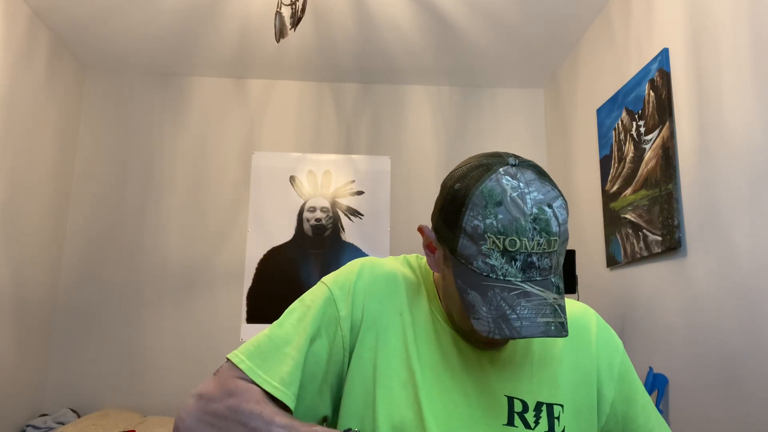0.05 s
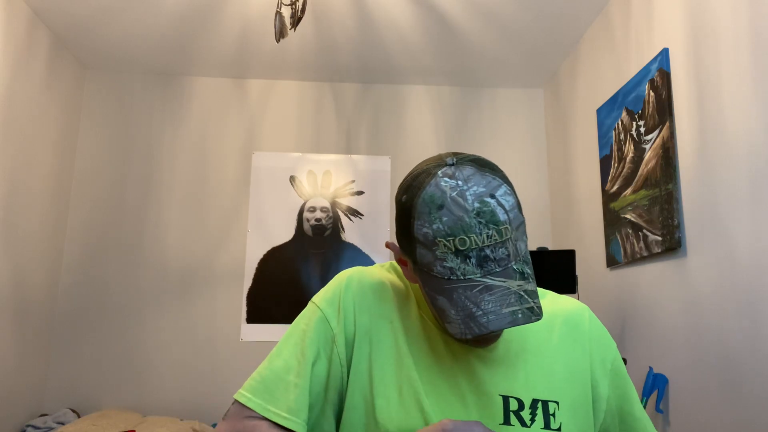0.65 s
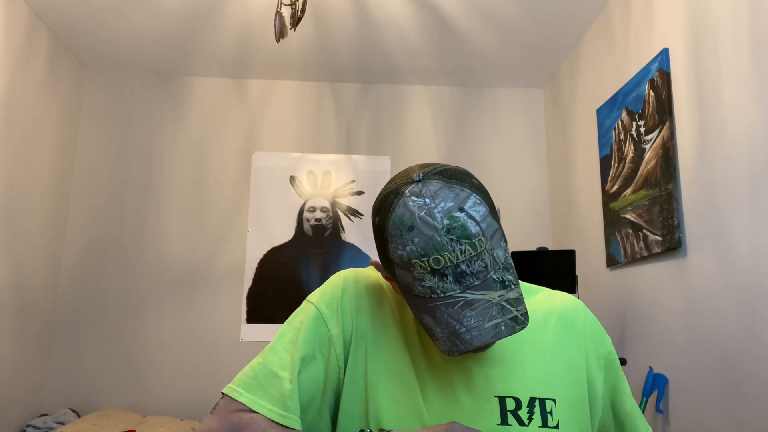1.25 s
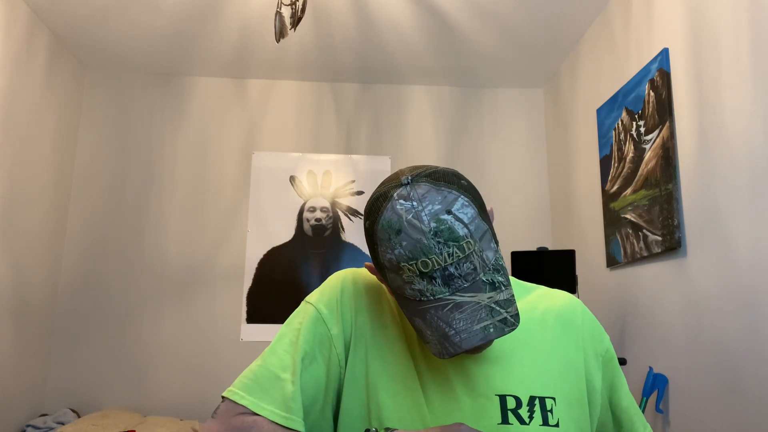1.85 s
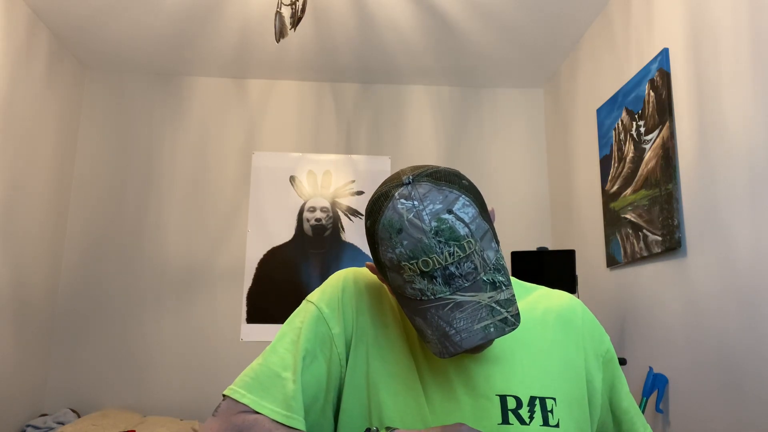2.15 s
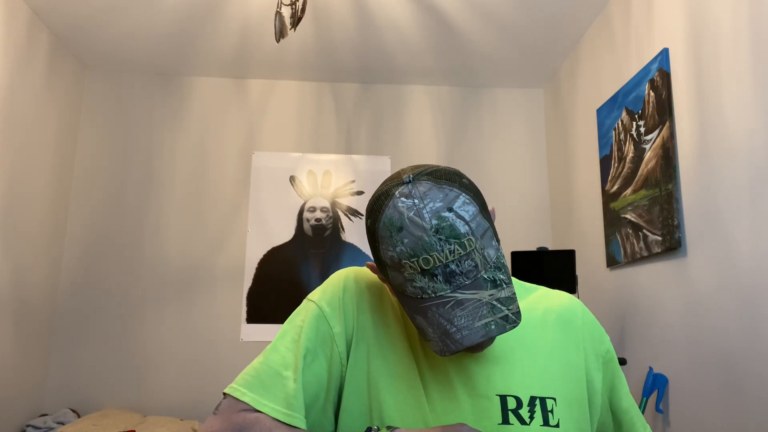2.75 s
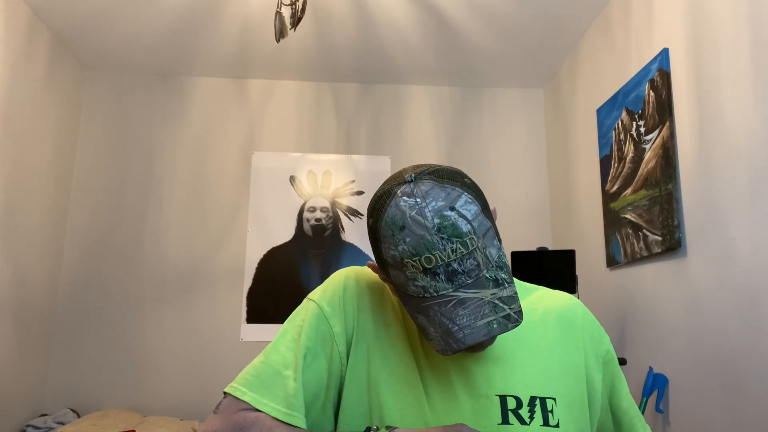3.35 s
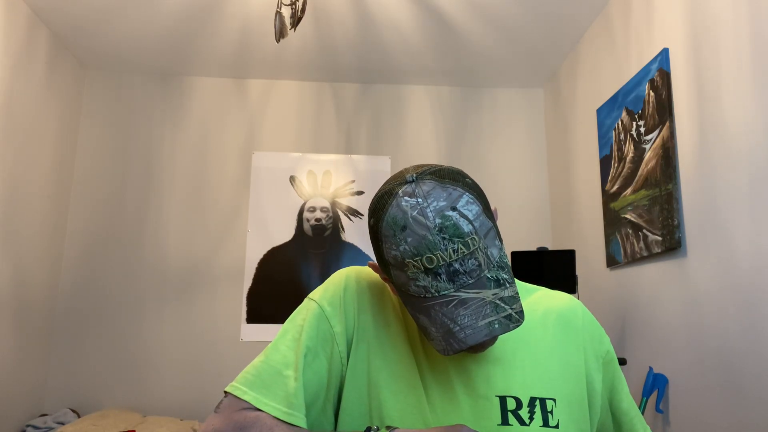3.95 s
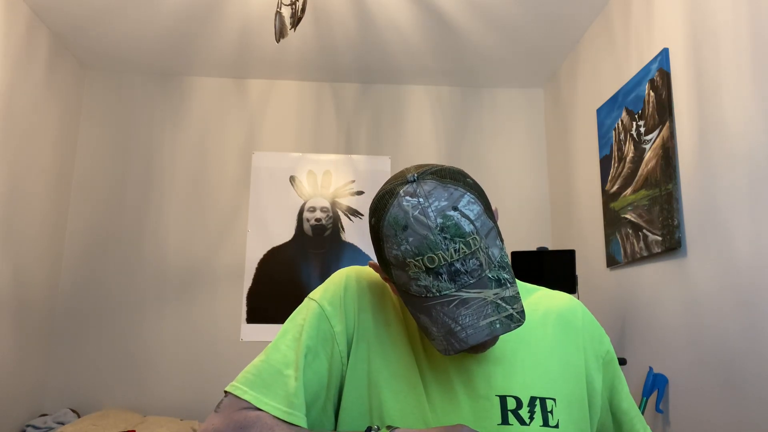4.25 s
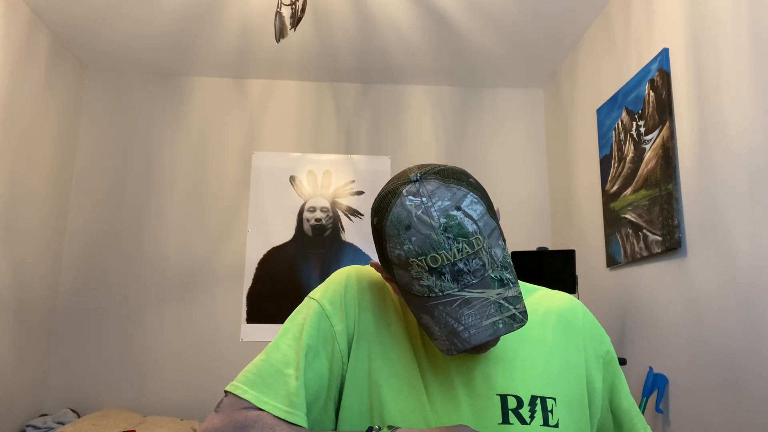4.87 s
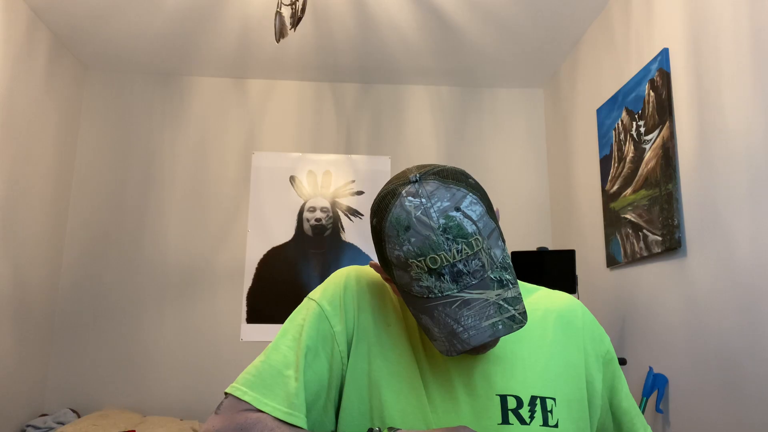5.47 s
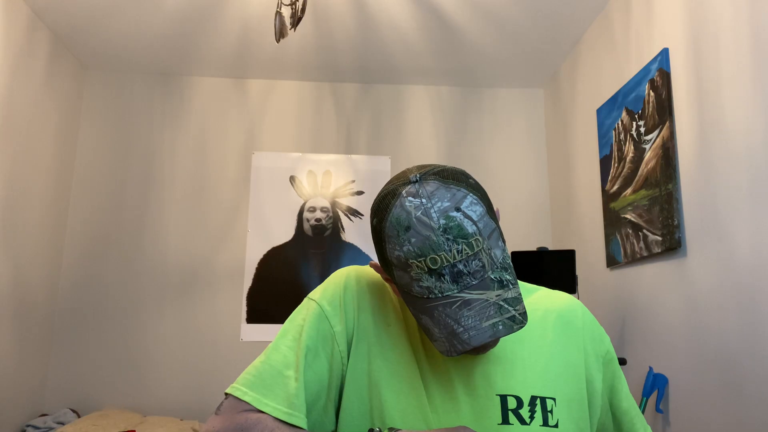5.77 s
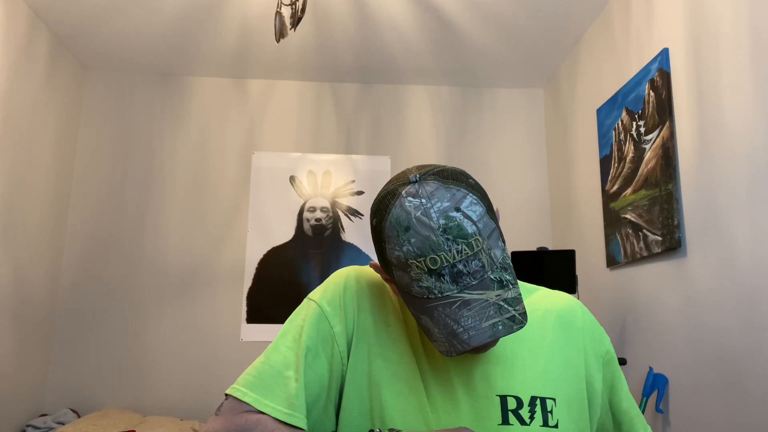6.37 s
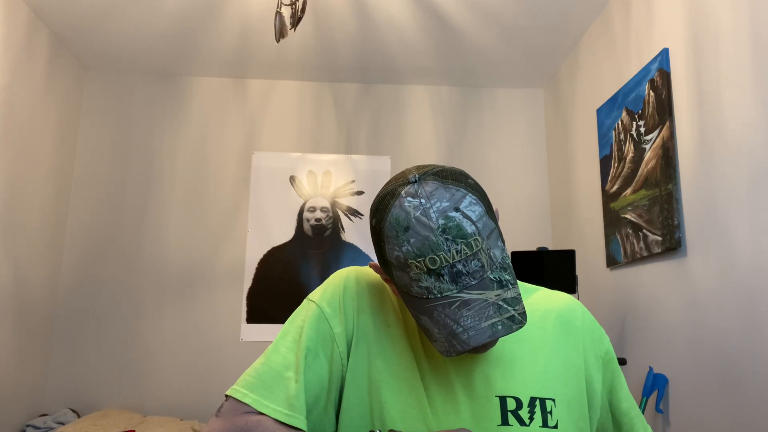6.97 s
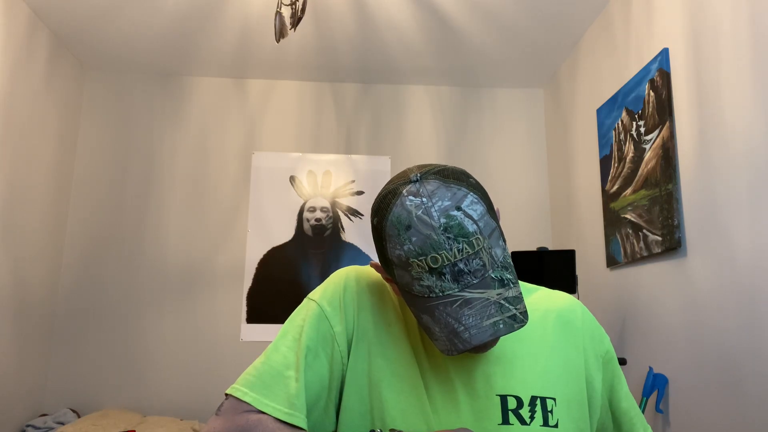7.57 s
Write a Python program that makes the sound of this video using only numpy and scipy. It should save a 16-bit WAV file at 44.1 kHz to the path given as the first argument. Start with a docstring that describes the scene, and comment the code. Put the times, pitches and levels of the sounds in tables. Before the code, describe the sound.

A small electric rotary tool hums and whines continuously, its wheel biting into plastic with scrapes, a brief screech and later grinding.

```python
"""A small room, a stereo microphone near a handheld rotary tool that cuts a slot in a plastic door.
From the start the motor sings a stack of shaft orders over its fan's rush and a mains buzz. Its speed
beats against the mains and slowly sags, so the orders slide through resonances of door and room,
swelling and shifting between left and right. From 1.9 to 4.2 s the wheel bites, rings and chatters.
Around 7 s it grinds deep in the slot and drags the motor down."""
import sys
import numpy as np
from scipy import signal
from scipy.fft import rfft, irfft
from scipy.io import wavfile
from scipy.ndimage import uniform_filter1d

SR = 44100
rng = np.random.default_rng(int(sys.argv[2]) if len(sys.argv) > 2 else 0)


def generate_wav(sig):
    """Save sig (samples, or channels by samples) to the path in sys.argv[1] as 16-bit PCM at SR."""
    pcm = np.round(np.clip(np.atleast_2d(sig).T, -1, 1) * 32767).astype(np.int16)
    wavfile.write(sys.argv[1], SR, pcm)


N = 336042
TIME, BINS = np.arange(N) / SR, np.fft.rfftfreq(N, 1 / SR)
MAINS_PULSE_HZ = 120

# shaft turns a second under the load of the cut: t/s, f/Hz
SHAFT_SPEED = [(0.0, 237.41), (0.18, 236.14), (0.33, 238.03), (0.47, 235.33), (2.3, 236.1), (2.6, 232.95),
               (3.35, 236.19), (3.6, 236.13), (3.75, 234.58), (4.4, 233.16), (5.05, 232.19), (5.4, 232.63),
               (5.9, 231.7), (6.65, 229.65), (6.8, 227.93), (7.2, 225.39), (7.45, 226.75), (7.62, 225.8)]
# multiples of the shaft speed that carry the hum
HUM_ORDERS = [1, 2, 3, 4, 5, 6, 7, 8, 10, 13, 14, 15]
# rings of the wheel and its shank: f/Hz, width/Hz, relative level/dB
WHEEL_MODES = [(3386, 125, 13), (5530, 170, 8), (8570, 240, 5.5), (9110, 85, 11.5), (9500, 3200, -10),
               (10740, 55, 9.5), (12400, 74, 6.5), (14200, 100, 5)]
# the microphone's two ports: f/Hz, likeness/0-1, left lead/rad
MIC_PORTS = [(200, .85, 0), (650, .4, .3), (1400, .3, -1), (2900, .45, 0), (4200, .3, -1.4), (6500, .2, 0),
             (7400, .85, 0), (8700, .75, -1.7), (9600, .995, -3.05), (10800, .995, -3.2),
             (11900, .55, -5.8), (13800, .9, -6.4), (14800, .95, -9.2)]


def gain_of(db):
    """Decibels to amplitude."""
    return 10 ** (np.asarray(db) / 20)


def unit_rms(x):
    """Scales to rms 1."""
    return x / np.sqrt(np.mean(abs(x) ** 2) + 1e-20)


def over_time(rows):
    """A table of times and values, at each sample."""
    return np.interp(TIME, *np.transpose(rows))


def over_freq(rows, hz):
    """Every column of a table of frequencies, interpolated on a log axis."""
    f, *columns = np.transpose(rows)
    return [np.interp(np.log(hz + 1), np.log(f + 1), c) for c in columns]


def drift(rate_hz):
    """Slow random wander of rms 1."""
    coarse = TIME[::128]
    f = np.fft.rfftfreq(len(coarse), 128 / SR)
    slow = irfft(rfft(rng.standard_normal(len(coarse))) / (1 + (f / rate_hz) ** 2), len(coarse))
    return np.interp(TIME, coarse, unit_rms(slow))


def rings(modes):
    """Frequency response of a set of resonances, alternating in sign."""
    return sum(gain_of(db) / (1 + 2j * (BINS - hz) / width) * (-1) ** k
               for k, (hz, width, db) in enumerate(modes))


def at_mic(pair, colour):
    """Colours two unrelated signals and makes them as alike as the two ports hear them, at rms 1."""
    likeness, lead = over_freq(MIC_PORTS, BINS)
    left, other = rfft(pair) * colour
    right = (likeness * left + np.sqrt(1 - likeness ** 2) * other) * np.exp(-1j * lead)
    return unit_rms(irfft([left, right], N))


def room(x, t60=0.015, wet_db=-8, echoes_per_s=2000):
    """Bare walls add a short tail of sparse reflections."""
    t = TIME[:SR // 2]
    arrivals = rng.random((2, len(t))) < echoes_per_s / SR
    taps = rng.standard_normal((2, len(t))) * arrivals * gain_of(-60 * t / t60)
    taps /= np.linalg.norm(taps, axis=1, keepdims=True)
    return x + gain_of(wet_db) * signal.fftconvolve(x, taps, axes=1)[:, :N]


def standing_waves(hz):
    """How strongly, and in what phase, a tone reaches the left and the right port."""
    # resonances of door and room: f/Hz, width/Hz, level/dB, left minus right/dB, left lead/rad
    resonances = [(232.76, 7.7, -43.5, 4, .5), (456.4, 7.5, -30.5, 1.5, 2.17), (465.1, 14, -35.5, 2.5, 0.5),
                  (690.6, 20, -32.5, 0.5, 3.5), (707, 5.8, -36.5, 0.5, -2), (710.6, 14.5, -32, -10, 0.61),
                  (906, 10.4, -26.5, 4, 0.5), (920.8, 12.1, -25, -2.5, 0.02), (933, 4.7, -36.5, -13, -1.34),
                  (944.8, 5.7, -39, -8, 0.9), (1127.3, 50, -36.5, -6.5, 1), (1159.2, 12.4, -33, 2.5, -0.7),
                  (1195.8, 11, -28, -4, 1.5), (1359, 13, -36.5, 0, 1.8), (1384, 27, -34, 0.5, -1.5),
                  (1572, 32, -31.5, -4, -0.5), (1633.4, 30, -41, -1, -1.1), (1810, 18, -33, 1, 4),
                  (1837.7, 37, -34.5, -4, 0), (1881, 5.3, -38, -6, 1.5), (2278.5, 42, -34.5, -3, 0),
                  (2365, 43, -39.5, -1.5, -0.54), (2966, 94, -38, 1, 0.8), (3073, 23.5, -37, -6.5, -1),
                  (3231, 61, -37.5, -3.5, 0.4), (3497, 350, -39, 0, 1)]
    left, right = 0, 0
    for centre_hz, width_hz, db, pan_db, lead in resonances:
        peak = gain_of(db) / (1 + (2 * (hz - centre_hz) / width_hz) ** 2)
        left += peak * gain_of(pan_db / 2)
        right += peak * gain_of(-pan_db / 2) * np.exp(-1j * lead)
    return left, right


def flare_db(order, width_s=0.085):
    """An order flares or drops out briefly as the tool passes a standing wave."""
    # swells and dips: t/s, order, level/dB
    flares = [(0.1, 20, 11), (0.1, 21, 10), (0.33, 15, 7), (4.26, 14, 7), (4.58, 14, -10), (4.62, 15, -11),
              (4.82, 7, 7), (7.04, 14, 9)]
    return sum(db * np.exp(-((TIME - s) / width_s) ** 2) for s, k, db in flares if round(k) == order)


def hunting(surge_hz2=2.325):
    """Speed swing in Hz as the shaft slips against twice the pulse rate: more slip, faster and smaller."""
    slip_hz = np.maximum(2 * MAINS_PULSE_HZ - over_time(SHAFT_SPEED), 1)
    return surge_hz2 / slip_hz * np.cos(2 * np.pi * np.cumsum(slip_hz) / SR)


def shaft_angle(play_rad=0.023):
    """The shaft turns at its hunting speed, with a little play in the bearings."""
    return 2 * np.pi * np.cumsum(over_time(SHAFT_SPEED) + hunting()) / SR + play_rad * drift(25)


def buzz(waver=0.98):
    """The chopped mains current shakes the motor's field."""
    # outline of the buzz lines before they waver: f/Hz, level/dB
    outline = [(120, -74.5), (600, -59), (840, -50), (1320, -54), (2040, -51), (2520, -59)]
    out = np.zeros((2, N))
    for hz in MAINS_PULSE_HZ * np.arange(1, 31):
        level = np.sqrt(2) * gain_of(over_freq(outline, hz)[0]) * (1 + waver * drift(9.4))
        out += level * np.cos(2 * np.pi * (hz * TIME + rng.random() + rng.random((2, 1)) / 2))
    return out


def fan(angle, grip, throb=0.15, ripple=0.11, flutter_db=0.7):
    """Air puffs from the vents each turn; in the second grip they face the microphone and hiss more."""
    # loudness of the rush: t/s, level/dB
    loudness = [(0, -31.5), (.55, -34.5), (1.8, -32.5), (2.6, -28.5), (4.3, -32), (6.6, -31)]
    # its colour with the vents on axis: f/Hz, relative level/dB
    on_axis = [(50, -16), (150, -20.5), (380, -10), (840, 4), (1600, 0), (3300, 0), (4640, -1.5),
               (8100, -1.5), (10400, -6.5), (13900, -8)]
    # the part of that colour owed to facing the microphone: f/Hz, level/dB
    facing = [(3300, -1), (8100, 5), (13900, 2.5)]
    puffs = 1 + throb * (np.cos(angle) + np.cos(2 * angle))
    mains_ripple = 1 + ripple * np.cos(2 * np.pi * MAINS_PULSE_HZ * TIME)
    air = rng.standard_normal((2, N)) * puffs * mains_ripple
    colour_db, facing_db = over_freq(on_axis, BINS)[0], over_freq(facing, BINS)[0]
    away, toward = at_mic(air, gain_of(colour_db - facing_db)), at_mic(air, gain_of(colour_db))
    return (away + (toward - away) * grip) * gain_of(over_time(loudness) + flutter_db * drift(37))


def whine(angle, grip, level_db=-31.5, sway_db=3.2, beat=0.25, shake_rad=0.7, wander_rad=0.3):
    """Brushes and bearings tick once a turn; mains pulses shake them, adding lines between the orders."""
    # outline of the ticking: order, relative level/dB in the first grip and in the second
    outline = [(9, -2.5, 6), (11.8, 1, 1.5), (16.2, 1, 2.5), (18.1, -2, 2.5), (20.7, -3.5, 0),
               (23.2, -1, -7), (26.5, 0, -0.5), (37.8, -3.5, -2.5), (42, -34, -39)]
    out, mains = np.zeros((2, N)), 2 * np.pi * MAINS_PULSE_HZ * TIME
    for order in sorted(set(range(1, 47)) - set(HUM_ORDERS)):
        first_db, second_db = over_freq(outline, order)
        pulse = np.cos(mains + 2 * np.pi * rng.random())
        db = first_db + (second_db - first_db) * grip + sway_db * drift(8) + flare_db(order)
        level = gain_of(db) * (1 + beat * (2 * pulse ** 2 - 1))
        shaken = order * angle + shake_rad * (1 - 0.6 * grip) * pulse
        for port in out:
            port += level * np.cos(shaken + 2 * np.pi * rng.random() + wander_rad * drift(4))
    out = room(out, t60=0.25, wet_db=-5)
    out /= np.sqrt(uniform_filter1d((out ** 2).mean(0), SR // 2))  # holds the overall level steady
    return at_mic(out, 1) * gain_of(level_db)


def hum(angle, lift_db=0.7, sway_db=0.5, sway_rad=0.18, sway_hz=6, scatter_rad=0.34, sluggish=4.3):
    """Imbalance and fan blades give the loud orders; each swells as it meets a resonance."""
    # rise and fall as the hand moves the tool, by order: t/s, level/dB
    hand_moves = {1: [(3.45, 0), (3.7, 3.5), (5.5, -2.5)], 2: [(6.77, 1), (6.83, -12), (7.02, 0),
                  (7.08, -12), (7.28, 4.5), (7.4, -11)], 3: [(0, -5.5), (.2, 2), (.55, -14.5), (1.1, 1),
                  (5.4, 0), (5.8, -12.5), (6.2, 4), (6.9, 11), (7.2, 0)], 4: [(3.6, -1), (3.75, -9),
                  (4.4, -16), (4.8, 0.5), (7.12, -2), (7.19, -9), (7.28, -7)], 6: [(2.8, 3), (4.4, 0)],
                  13: [(.3, -12), (.6, 2.5), (2.1, 5), (3.5, 6), (4.8, -8), (6, 5), (7.2, 3)]}
    out, grid_hz = np.zeros((2, N)), BINS[BINS < SR / 10]
    mean_hz, hunting_hz = over_time(SHAFT_SPEED), hunting()
    responses = standing_waves(grid_hz)
    for order in HUM_ORDERS:
        reach = np.sqrt(order)  # the hand's sway moves the short waves most
        moved_db = over_time(hand_moves.get(order, [(0, 0)]))
        db = lift_db + sway_db * reach * drift(sway_hz) + moved_db + flare_db(order)
        phase = order * (angle + scatter_rad * rng.standard_normal())  # only low orders line up
        tone = -np.exp(1j * phase) * gain_of(db)
        # low resonances build up slowly; high ones surge with the hunting
        felt_hz = order * (mean_hz + hunting_hz * order / (order + sluggish))
        for port, response in zip(out, responses):
            sway = np.exp(1j * sway_rad * reach * drift(sway_hz))
            port += np.sqrt(2) * (tone * sway * np.interp(felt_hz, grid_hz, response)).real
    return out


def pressing(attack_s=0.036, release_db_per_s=116):
    """Strength of rasp, chatter and screech: each press into the plastic rises, holds and lets go."""
    # presses of the wheel: t/s, hold/s, level/dB of rasp, of chatter and of screech
    presses = [(1.9, 1, -33, -70, -63), (2.916, 0.037, -29, -34, -65), (3.1, .36, -44, -50, -68),
               (3.546, 0.068, -27, -37, -25), (3.663, 0.085, -34.5, -26, -26),
               (3.806, 0.091, -35, -32, -36), (7.077, 0.1, -49, -31.5, -60)]
    power = np.zeros((3, N))
    for start, hold, *levels_db in presses:
        rise = np.clip((TIME - start) / attack_s, 0, 1)
        fade_db = release_db_per_s * np.maximum(TIME - start - attack_s - hold, 0)
        power += np.outer(gain_of(levels_db), rise * gain_of(-fade_db)) ** 2
    return np.sqrt(power)


def boom(knock):
    """The whole door panel shudders under the chatter."""
    # the door's lowest mode: f/Hz, width/Hz, level/dB against the chatter
    lowest_mode = (106, 16, -33)
    hz, width_hz, db = lowest_mode
    return at_mic(rng.standard_normal((2, N)), rings([(hz, width_hz, 0)]) ** 2) * knock * gain_of(db)


def screech(angle, strength, throb=0.34):
    """At the deepest push the wheel's rim grinds once a turn and its highest rings take over."""
    friction = rng.standard_normal((2, N)) * (1 + throb * np.cos(angle))
    return at_mic(friction, rings(WHEEL_MODES[-5:])) * strength


def chatter(angle, strength, skid_rad=0.007):
    """Pressed deep, the wheel knocks on the slot wall once a turn and squeals at the shank's modes."""
    shank_modes = [(3440, 160, 8), (4060, 200, -1), (5700, 110, 6.5)]  # f/Hz, width/Hz, relative level/dB
    slipping = angle + skid_rad * drift(60)
    knocks = sum(np.cos(order * slipping) for order in range(10, 48))
    squeal = rfft(knocks) * rings(shank_modes)
    lead = over_freq(MIC_PORTS, BINS)[1]
    return unit_rms(irfft([squeal, squeal * np.exp(-1j * lead)], N)) * strength


def grinding(angle, dragged_hz=225.67, dragged_db=-24, fade_db_per_hz=1.5, throb=0.15, uneven_db=1.66):
    """Deep in the slot the wheel grinds: the more it slows the shaft, the louder it rasps."""
    # colour of the grinding: f/Hz, relative level/dB
    colour = [(50, -26), (110, -14.5), (170, -30), (400, -8.5), (900, 0.5), (1600, 4), (3300, 2),
              (5000, -1), (8100, 5.5), (10400, -10), (13500, -3.5)]
    free_hz = np.maximum(over_time(SHAFT_SPEED) - dragged_hz, 0)
    dust = rng.standard_normal((2, N)) * (1 + throb * np.cos(angle))
    db = dragged_db - fade_db_per_hz * free_hz + uneven_db * drift(12)
    return at_mic(dust, gain_of(over_freq(colour, BINS)[0])) * gain_of(db)


def cutting(angle, strength, chips_per_s=5000, spread_db=3, throb=0.49, uneven_db=4, door_gain=0.52):
    """Chips tear off hardest on the wheel's high side; each one rings the wheel and rasps the door."""
    # the wheel catches in the slot: t/s, level/dB, rise/s, the door's share of the blow/0-1
    bites = [(1.916, -27.5, 0.016, 0.4), (2.06, -29, 0.01, 0.3), (2.244, -20, 0.011, 0.43),
             (2.355, -23, 0.016, 0.82), (2.467, -23.5, 0.016, 0.77), (2.586, -21.5, 0.015, 0.56),
             (2.658, -22.5, 0.022, 0.68), (3.072, -30, 0.013, 0.2), (3.502, -21, 0.0085, 0.63),
             (3.55, -22, 0.0087, 0.4), (3.611, -24, 0.012, 0.55), (4.107, -28, .008, .2)]
    # the door's answer to the wheel: f/Hz, relative level/dB
    door_colour = [(40, -55), (200, -7), (320, -12), (800, 2), (1800, 3), (3000, -3), (7000, -5.5),
                   (15500, -48)]
    steady = strength * gain_of(uneven_db * drift(22))
    wheel_power, door_power = steady ** 2, (door_gain * steady) ** 2
    for start, db, rise_s, share in bites:
        age = np.maximum(TIME - start, 0) / rise_s
        power = (gain_of(db) * age * np.exp(1 - age)) ** 2
        wheel_power += (1 - share ** 2) * power
        door_power += share ** 2 * power
    size = gain_of(spread_db * np.minimum(rng.exponential(1, (2, N)), 4)) * rng.choice([-1, 1], (2, N))
    chips = size * (rng.random((2, N)) < chips_per_s / SR) * (1 + throb * np.cos(angle))
    wheel = np.sqrt(wheel_power) * at_mic(chips, rings(WHEEL_MODES))
    door = np.sqrt(door_power) * at_mic(chips, gain_of(over_freq(door_colour, BINS)[0]))
    return wheel + door


def scene():
    """One shaft drives the fan, the motor's tones and the cut."""
    # how the tool is held: t/s, grip (0 first, 1 second)
    grips = [(2.2, 0), (3.6, 0.87), (6, 1)]
    angle, grip = shaft_angle(), over_time(grips)
    rasp, knock, rim = pressing()
    motor = hum(angle) + whine(angle, grip) + buzz() + fan(angle, grip)
    cut = room(cutting(angle, rasp) + chatter(angle, knock))
    return motor + cut + screech(angle, rim) + boom(knock) + grinding(angle)


def record(dry):
    """The microphone rolls off below 45 Hz and hears nothing far above 15.5 kHz."""
    thinned = signal.sosfilt(signal.butter(2, 45, "high", fs=SR, output="sos"), dry)
    band_limit = signal.firwin(511, 15500, window=("kaiser", 9), fs=SR)
    return signal.oaconvolve(thinned, band_limit[None], "same")


dry = scene()
out = record(dry)
generate_wav(out)
```